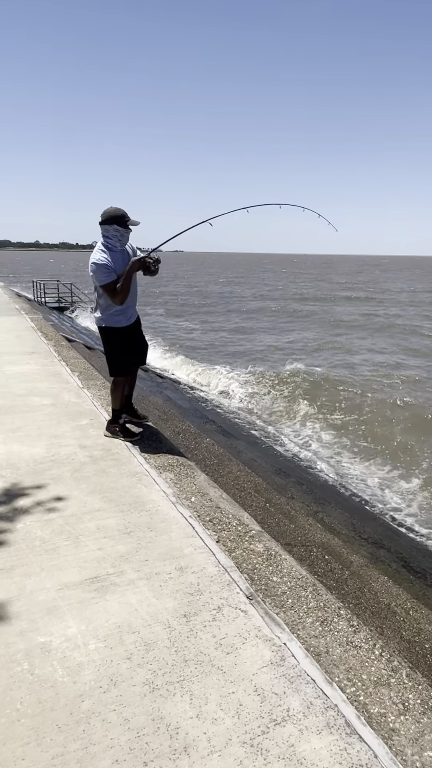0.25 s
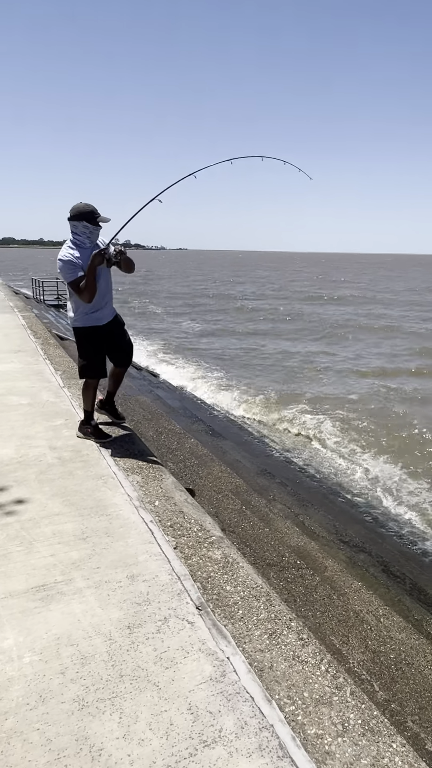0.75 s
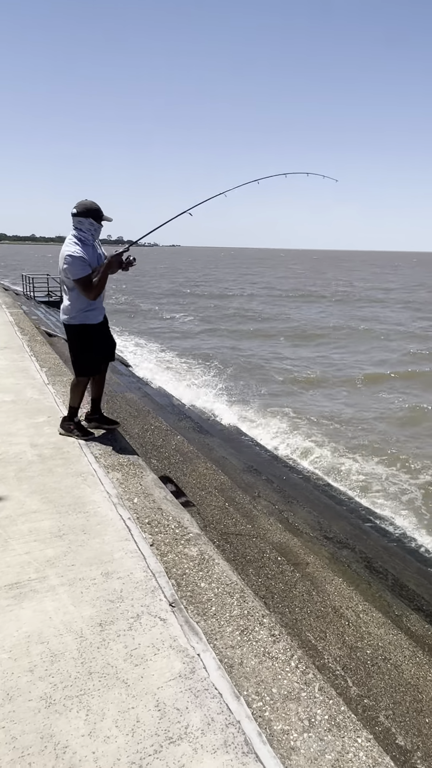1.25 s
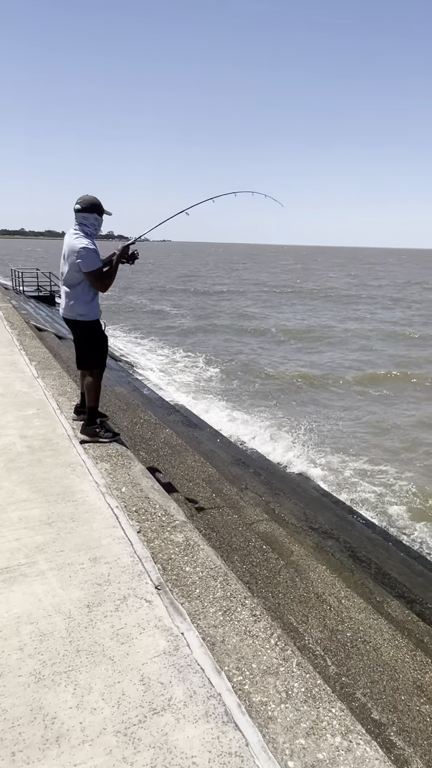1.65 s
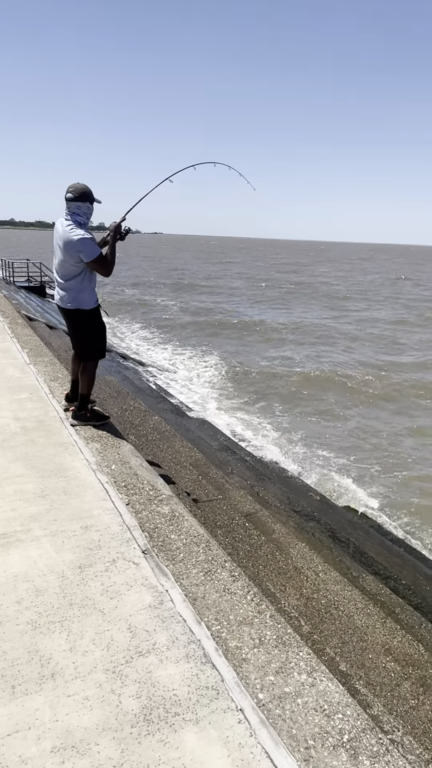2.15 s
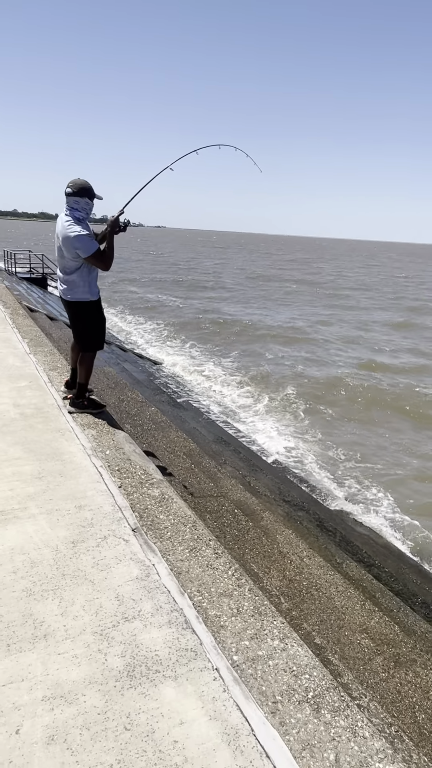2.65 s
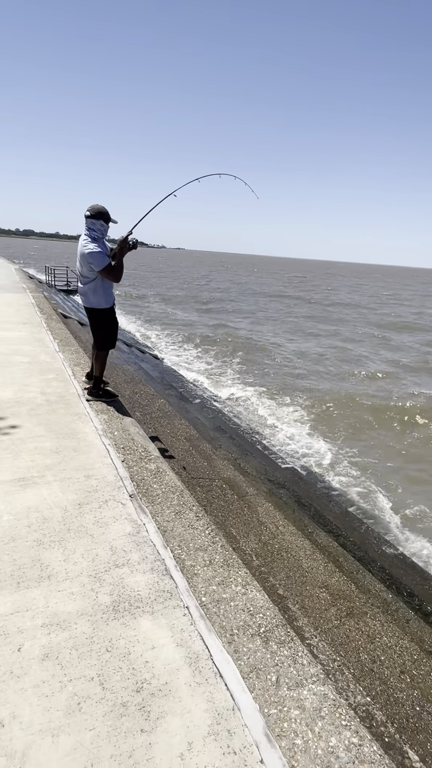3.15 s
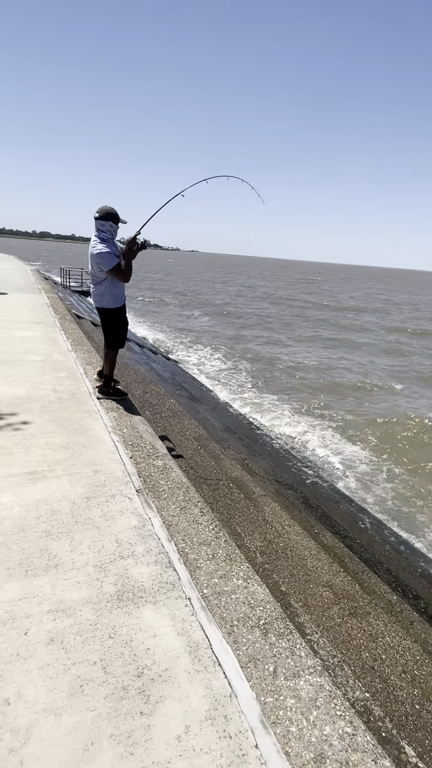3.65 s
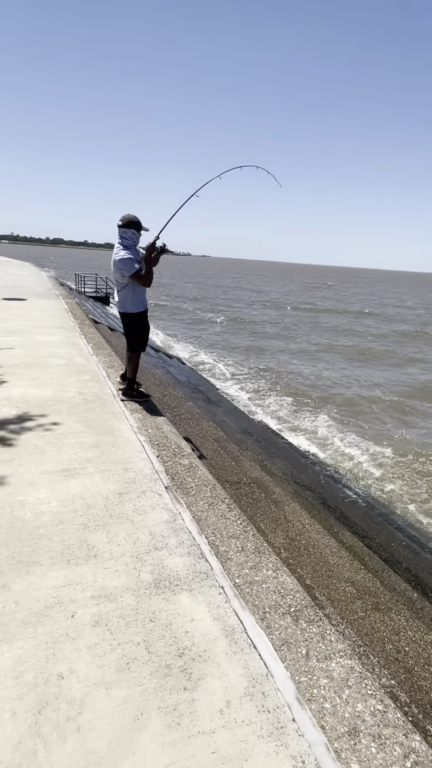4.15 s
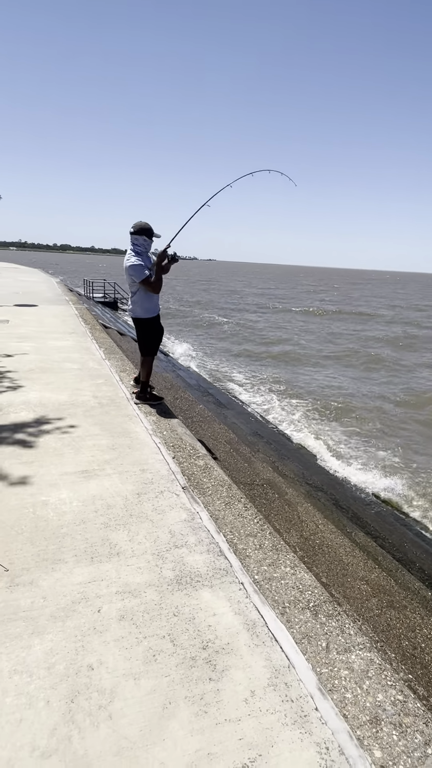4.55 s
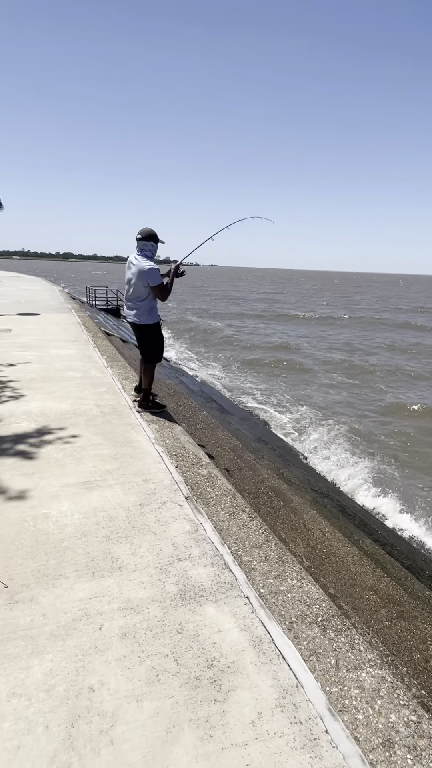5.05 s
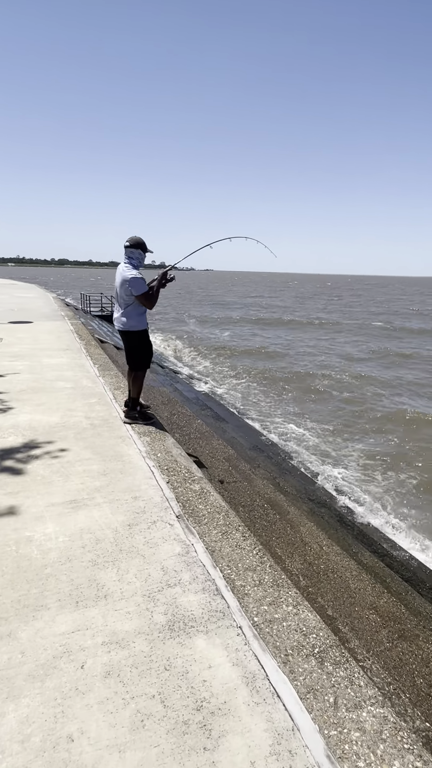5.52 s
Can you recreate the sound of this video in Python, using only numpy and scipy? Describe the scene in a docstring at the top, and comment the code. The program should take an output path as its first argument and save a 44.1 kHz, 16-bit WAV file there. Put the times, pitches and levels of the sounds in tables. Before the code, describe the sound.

Outdoors at a wide, choppy lake, waves run along a sloping concrete seawall. A soft low thud opens, then water churns steadily, with booming crests, hollow gulps, gurgles, slaps and hissing foam. After an early lull the wind freshens, rumbling and thumping on the exposed microphone. The bass sits in the middle while the splashing spreads to both sides.

```python
"""Choppy lake waves run along a sloping concrete seawall while wind presses on the microphone.
A thud on the wall, a ring of damped modes, comes first over the churn: resonant bubble swarms and noise.
Each wave booms and leaves hissing foam and spray; air pockets gulp, bubble clumps gurgle and
sheets of water slap the concrete. After a lull the wind, shaped noise, freshens and eddies thump.
Two ports a little apart pick up the water; the bass is the same in both."""
import sys
import numpy as np
from scipy import signal
from scipy.fft import rfft, irfft
from scipy.io import wavfile
from scipy.ndimage import uniform_filter1d

SR = 44100
rng = np.random.default_rng(int(sys.argv[2]) if len(sys.argv) > 2 else 0)


def store_wav(level_fs):
    """Save 16-bit WAV to argv[1]."""
    pcm = np.round(np.clip(np.atleast_2d(level_fs), -1, 1) * 32767)
    wavfile.write(sys.argv[1], SR, pcm.T.astype(np.int16))


N = 255074
TIME = np.arange(N) / SR
FRAME = 1024  # samples in a short-time spectrum
HZ = np.fft.rfftfreq(FRAME, 1 / SR)[:, None]

# waves that break on the wall: (crest [s], strength over the calm wash [dB], build-up [s], drain [s],
# weight of the trapped air in the boom [dB], boom pitch [Hz])
WAVES = [(.14, 0.5, 0.046, 1, -25, 277), (.92, 6.5, 0.35, 0.37, -0.5, 306), (1.4, 4, 0.37, 0.092, 2, 293),
         (2.361, -2.5, 0.15, 0.31, 1, 285), (2.95, 2.5, 0.29, 0.42, 3, 221), (3.6, 8, 0.52, 0.24, 0.5, 191),
         (4.84, 8, 0.46, 0.71, 1.5, 247), (5.42, 4.5, 0.5, 1, -10, 195)]
# answer of a bubble size to the waves: (calm level [dB], rise per surge [dB/dB], delay [s],
# change per treble level [dB/dB])
BOOM_LAW = (-43, 1.3344, 0.14, -0.15)
FOAM_LAW = (-54.4, 0.96, 0.02, 0.5)
SPRAY_LAW = (-57.7, 0.85, 0.02, 1)
# rise and fall of the treble, with a brief dip near 2.2 s; each law scales it: (time [s], level [dB])
TREBLE_LEVEL = [(0, -7.6), (.45, -5.4), (.9, -4.2), (1.25, -5), (1.45, -4.2), (1.75, -1.2), (2.1, -2),
                (2.19, -5.2), (2.3, -3.6), (2.55, -4.4), (2.7, -2.7), (3.45, -3.6), (3.8, -2), (4.25, -3.2),
                (4.7, -.6), (5.1, -1), (5.78, -1.3)]
# the churn before its hollow, slaps and tumbling: (time [s], level [dB])
CHURN_LEVEL = [(0, -45), (.15, -39.5), (.55, -41), (.85, -37.5), (1.15, -39), (1.4, -38.5), (1.7, -40.5),
               (2.05, -43.5), (2.3, -42), (2.7, -41), (3.1, -40.5), (3.55, -35.5), (3.9, -39), (4.2, -40.5),
               (4.5, -38), (4.95, -37.5), (5.3, -38), (5.78, -39.5)]
# relative spectra of the bubble sizes: (frequency [Hz], level per Hz [dB])
BOOM_SPECTRUM = [(50, -65), (130, -5), (190, -1), (280, 0.5), (380, -4), (520, -15), (800, -46),
                 (2000, -71)]
CHURN_SPECTRUM = [(150, -11), (350, 4), (520, 5), (700, 2.5), (1000, -3.5), (1500, -7.5), (2000, -12.5),
                  (3000, -12), (7000, -61)]
FOAM_SPECTRUM = [(700, -17), (1600, -7), (2200, -5), (2800, 0), (3600, -4.5), (4400, -3.7), (5500, -8),
                 (7000, -15), (9000, -24), (16000, -45)]
SPRAY_SPECTRUM = [(2500, -25), (4500, -3), (5600, 2), (7000, 0), (8500, -1), (10000, -2.5), (11500, -5),
                  (13700, -5.5), (15500, -16)]
# a wandering spectral peak: (time [s], pitch [Hz], lift [dB])
CHURN_PEAK = [(0, 780, 7.5), (.55, 755, -0.5), (.9, 1870, 1.5), (1.6, 2000, 3), (2.1, 770, 1),
              (2.65, 787, 5.5), (3.1, 1050, -0.5), (3.9, 1100, -0.5), (4.5, 1380, 0.5), (5.05, 1150, 5),
              (5.5, 860, 3.5), (5.78, 770, 7)]
FOAM_PEAK = [(0, 3800, 1), (.45, 3820, 2.5), (1.0, 3850, 0.5), (1.6, 4200, 0.5), (2.6, 5000, 0),
             (4.1, 4900, 0), (4.4, 3060, 1), (4.8, 2900, 2), (5.3, 3000, -1.5), (5.78, 3800, 2.5)]
SPRAY_PEAK = [(0, 4300, 2), (1.6, 4500, 2), (2.6, 5000, 2.5), (3.0, 5800, 4.5), (4.1, 6200, 4),
              (4.8, 6000, 4), (5.78, 6400, 3.5)]
# a narrow hollow in the churn, a bump where positive: (time [s], pitch [Hz], change [dB])
HOLLOW = [(0, 1460, -1), (.55, 1190, -1), (1.3, 800, -1.5), (1.9, 950, -1.5), (2.5, 980, -2),
          (2.75, 895, -2), (2.95, 706, 2), (4.1, 760, -0.5), (4.8, 650, -11.5), (5.5, 584, 3)]
# the port pair, before its blend toward mono: (frequency [Hz], left-right likeness [0-1],
# lead of the left [rad], left over right [dB])
PORTS = [(250, .6, 1.8, 6), (450, .8, 2.6, 2.2), (660, .92, 3.15, 1), (820, .7, 3.6, 2.5),
         (1050, .45, 4.6, 4.6), (1600, .74, 6, 3.5), (2100, .66, 7.7, 1), (2400, .72, 9.4, 0),
         (2750, .72, 10, 0), (3200, .68, 9.9, -.6), (4100, .45, 10.1, -2.4), (5100, .82, 8.9, -2.5),
         (5900, .9, 9.5, .7), (6600, .76, 10.1, .4), (8000, .68, 12.2, -.8), (10200, .88, 15.7, 0),
         (12400, .82, 18.85, 0), (15500, .7, 23.4, 0)]
# the ports share all below an edge: (time [s], edge [Hz], steepness [filter order], share above it [0-1])
MONO_BELOW = [(0, 1070, 11, 0.01), (1.5, 1020, 10, 0), (2.1, 730, 13, 0), (2.7, 536, 12, 0.01),
              (4.0, 564, 12, 0.02), (4.5, 396, 6, 0), (5.78, 410, 4.5, 0)]
# foam spread widely along the wall makes the ports less alike in one band: (time [s], loss of likeness [0-1])
FOAM_SPREAD = [(0, .95), (1.5, .8), (2.2, .35), (4.0, .25), (4.6, 0)]
FOAM_SPREAD_HZ, FOAM_SPREAD_OCTAVES = 4150, .29
# wind at the microphone before its gusts, a lull and then a fresh breeze: (time [s], level [dB])
WIND_LEVEL = [(0, -38), (.25, -42.5), (.72, -47.5), (1.0, -42), (2.55, -40), (2.95, -33), (3.5, -30.5),
              (3.85, -34.5), (4.55, -32), (5.15, -29.5), (5.78, -30)]
# relative spectrum of the wind: (frequency [Hz], level per Hz [dB])
RUMBLE_SPECTRUM = [(15, -58), (28, -25), (45, 1), (63, -8.5), (100, 2), (150, -5.5), (250, -15), (600, -81),
                   (2000, -80)]
# rings of a lump of water on the wall: (frequency [Hz], peak before the trim [dB], t60 [s])
THUD_RINGS = [(169, -16, 0.067), (321, -14.5, 0.09), (466, -20.5, 0.051)]
# air pockets that close under a crest: (time [s], peak before the trim [dB], pitch [Hz])
GULPS = [(0.213, -23.5, 192), (1.194, -13.5, 248), (1.287, -17.5, 290), (1.38, -17.5, 243),
         (1.497, -14.5, 293), (1.641, -20, 245), (2.398, -25.5, 258), (2.645, -20, 258), (3.226, -6.5, 232),
         (3.345, -20.5, 303), (3.445, -18, 205), (3.594, -12, 231), (3.754, -19.5, 327), (4.45, -23, 338),
         (4.569, -14, 269), (4.631, -16.5, 274), (4.824, -14, 273), (4.854, -14, 303), (5.104, -15.5, 297),
         (5.417, -11, 193)]
# clumps of bubbles out of the wash: (time [s], level over the uncoloured wash [dB], pitch [Hz], length [s])
GURGLES = [(.78, 0, 1360, .035), (.895, 4, 1920, 0.027), (1.275, 3, 1050, 0.021), (1.36, -1.5, 1080, .2),
           (2.265, 5, 775, .04), (2.545, -3, 765, 0.037), (2.86, 4, 880, .16), (3.06, 9, 1080, .03),
           (3.075, 6, 686, 0.027), (3.17, 5, 1044, 0.13), (3.92, 2, 1140, 0.042), (4.38, 3, 606, .025),
           (4.465, 5, 1210, 0.03), (4.821, 4, 1640, 0.067), (5.0, 0, 1090, 0.066), (5.09, -6, 760, 0.041),
           (5.425, -4, 645, 0.021), (5.49, -1, 880, 0.041)]
# sheets of water that slap the concrete, before their raggedness: (time [s], rise of the churn [dB],
# rise of the hiss [dB], twice the time to the peak [s])
SLAPS = [(0.9, 1, 2, 0.023), (1.26, 4.5, 4.5, 0.041), (1.34, 3.5, 1, 0.051), (1.538, 0.5, 3.5, 0.066),
         (2.37, 1.5, 4, 0.027), (3.073, 3, 1.5, 0.066), (3.223, 5.5, 4, .024), (4.803, 1.5, 2.8, 0.036),
         (5.417, 2, 0.5, .025)]
# eddies that strike the microphone: (time [s], peak before the trim [dB], pitch [Hz], t60 [s])
BUFFETS = [(3.452, -9.5, 86.5, 0.081), (3.519, -9, 173, 0.1), (3.524, -8.5, 85, 0.073),
           (4.565, -20, 91.5, 0.054), (4.848, -11, 128, 0.036), (5.19, -15, 69, 0.22),
           (5.654, -11, 63, 0.092)]


def gain_of(db):
    """Level: decibels as an amplitude ratio."""
    return 10 ** (np.asarray(db) / 20)


def evened(x):
    """Normalisation: a signal scaled to rms 1."""
    return x / np.sqrt(np.mean(x ** 2) + 1e-20)


def curves(rows, t=TIME):
    """Linear interpolation: every column of a time table at the times t."""
    s, *columns = np.transpose(rows)
    return [np.interp(t, s, c) for c in columns]


def spectra(rows):
    """Logarithmic pitch scale: every column of a frequency table, interpolated over log frequency."""
    f, *columns = np.transpose(rows)
    return [np.interp(np.log(HZ + 1), np.log(f), c) for c in columns]


def bell(centre_hz, octaves):
    """Resonance shape: a Gaussian over pitch, 1 at its centre."""
    distance = np.log2((HZ + 1) / centre_hz)
    return np.exp(-(distance / octaves) ** 2)


def to_frames(x):
    """Short-time Fourier analysis: frame times and spectra."""
    return signal.stft(x, SR, nperseg=FRAME, noverlap=FRAME - FRAME // 4)[1:]


def to_sound(z):
    """Overlap-add synthesis: short-time spectra back to samples."""
    return signal.istft(z, SR, nperseg=FRAME, noverlap=FRAME - FRAME // 4)[1][..., :N]


def flutter(rate_hz):
    """Turbulent fluctuation: band-shaped noise of rms 1, from about 2 Hz to the given rate."""
    f = np.fft.rfftfreq(N, 1 / SR)
    band = np.exp(-(f / rate_hz) ** 2) * (1 - np.exp(-(f / 2) ** 2))
    return evened(irfft(rfft(rng.standard_normal(N)) * band, N))


def patches(shape, frames, bins):
    """Local variation: a smoothed random field of rms 1, as if single splashes had their own colours."""
    field = uniform_filter1d(rng.standard_normal(shape), bins, axis=0)
    for _ in range(2):
        field = uniform_filter1d(field, frames, axis=1)
    return evened(field)


def ring(hz, t60, swell_s, glide):
    """Damped resonance: a sine swells and decays; its pitch shifts by the fraction 2 * glide over t60."""
    t = np.arange(int(t60 * SR) + 2) / SR
    shape = (1 - np.exp(-(t / swell_s) ** 2)) * gain_of(-60 * t / t60)
    return shape / shape.max() * np.sin(2 * np.pi * hz * t * (1 + glide * t / t60))


def thumps(rows, trim_db, swell_s, glide):
    """Superposition: damped rings (time [s], peak before the trim [dB], pitch [Hz], t60 [s]) add up."""
    out = np.zeros(N)
    for s, db, hz, t60 in rows:
        thump = gain_of(db + trim_db) * ring(hz, t60, swell_s, glide)
        part = out[round(s * SR):][:len(thump)]
        part += thump[:len(part)]
    return out


def bubbles(low_hz, high_hz, per_s, cycles, spread_db, share, count=24):
    """Bubble resonance: two unrelated swarms of rising rings over the smooth noise of countless far ones."""
    swarm = np.zeros((2, N))
    for hz in np.geomspace(low_hz, high_hz, count):
        sizes = gain_of(spread_db * np.minimum(rng.exponential(1, (2, N)), 4))
        births = sizes * (rng.random((2, N)) < per_s / count / SR)
        bubble = ring(hz, cycles / hz, swell_s=.5 / hz, glide=0.12)
        swarm += signal.oaconvolve(births, hz * bubble[None], axes=1)[:, :N]
    # the swarm has the same power per Hz as the noise within its band
    swarm = evened(swarm) * np.sqrt(2 * (high_hz - low_hz) / SR)
    return np.sqrt(share) * swarm + np.sqrt(1 - share) * rng.standard_normal((2, N))


def at_ports(pair, colour, peak, peak_octaves, patchy_db):
    """Interaural coherence: colours and blends two sounds into left and right; their mean has rms 1."""
    t, (a, b) = to_frames(pair)
    likeness, lead, balance_db = spectra(PORTS)
    edge_hz, steepness, shared = curves(MONO_BELOW, t)
    apart = (1 - np.clip(shared, 0, 1)) * (1 - 1 / (1 + (HZ / edge_hz) ** steepness))
    spread_loss = curves(FOAM_SPREAD, t)[0] * bell(FOAM_SPREAD_HZ, FOAM_SPREAD_OCTAVES)
    likeness = np.clip(likeness * (1 - spread_loss), 0, .92)
    # water to one side reaches the ports at different times
    same = 1 - apart + apart * likeness * np.exp(-1j * lead)
    right = same * a + np.sqrt(np.maximum(1 - abs(same) ** 2, 0)) * b
    lean = gain_of(np.sqrt(apart) * balance_db / 2)
    peak_hz, peak_db = curves(peak, t)
    gain = gain_of(spectra(colour)[0] + peak_db * bell(peak_hz, peak_octaves))
    # the colour moves while the expected loudness of the mean stays
    gain = gain / np.sqrt((gain ** 2 * (1 + same.real)).sum(0))
    gain = gain * gain_of(patchy_db * patches(a.shape, frames=7, bins=7))
    out = to_sound(np.array([a * lean, right / lean]) * gain)
    return out / np.std(out.mean(0))


def swells(t):
    """Wave growth and decay: power builds as a bell curve to each crest, then drains exponentially."""
    powers = []
    for crest, db, build, drain, *_ in WAVES:
        before = np.minimum(t - crest, 0) / build
        after = np.maximum(t - crest, 0) / drain
        powers.append(gain_of(db) ** 2 * np.exp(-before ** 2 - after))
    return np.array(powers)


def level(law, weights=1):
    """Energy summation: the calm level [dB] of one bubble size, raised by the surge of all waves."""
    calm_db, follow, delay, treble = law
    surge_db = 10 * np.log10(1 + (weights * swells(TIME - delay).T).sum(1))
    return calm_db + follow * surge_db + treble * curves(TREBLE_LEVEL)[0]


def commonest(pitches, lift_db, delay_s):
    """Weighted mean: rows (time [s], pitch [Hz], lift [dB]) led by the strongest wave a moment ago."""
    t = TIME[::FRAME]
    power = swells(t - delay_s) ** 2 + 1e-12
    share = power / power.sum(0)
    return np.column_stack([t, pitches @ share, np.full(len(t), lift_db)])


def boom():
    """Low bubble resonance: clouds of trapped air boom as waves break, at the pitch of the wave."""
    *_, air_db, boom_hz = np.transpose(WAVES)
    pair = bubbles(140.7, 546, per_s=330, cycles=31.7, spread_db=1.0, share=0.17)
    peak = commonest(boom_hz, lift_db=3.5, delay_s=0.16)
    pair = at_ports(pair, BOOM_SPECTRUM, peak, peak_octaves=0.48, patchy_db=-0.7)
    return pair * gain_of(level(BOOM_LAW, gain_of(air_db) ** 2) + 0.56 * flutter(rate_hz=9))


def hollowed(pair, octaves):
    """Spectral notch: a narrow hollow wanders in pitch and depth."""
    t, z = to_frames(pair)
    hz, change_db = curves(HOLLOW, t)
    return to_sound(z * gain_of(change_db * bell(hz, octaves)))


def churn(tumble, splash_db):
    """Middle bubble resonance: tumbling water rings with bubbles and gurgles, on its own level curve."""
    pair = bubbles(464.0, 2463, per_s=520, cycles=22.6, spread_db=1.7, share=0.46)
    pair = pair + gurgles(scatter_octaves=.2, cycles=25)
    pair = at_ports(pair, CHURN_SPECTRUM, CHURN_PEAK, peak_octaves=0.32, patchy_db=1.47)
    pair = hollowed(pair, octaves=0.11)
    return pair * gain_of(curves(CHURN_LEVEL)[0] + splash_db + 0.35 * tumble)


def foam(tumble, slap_db):
    """Small-bubble resonance: many short, high rings merge into a hiss."""
    pair = bubbles(1720, 6700, per_s=2800, cycles=5.7, spread_db=6.0, share=0.15)
    pair = at_ports(pair, FOAM_SPECTRUM, FOAM_PEAK, peak_octaves=.25, patchy_db=1.2)
    return pair * gain_of(level(FOAM_LAW) + slap_db + 0.6 * tumble)


def spray(tumble, slap_db):
    """Finest bubble resonance: the highest rings and noise make the spray's hiss."""
    pair = bubbles(5000, 15500, per_s=1800, cycles=8, spread_db=3.6, share=.33)
    pair = at_ports(pair, SPRAY_SPECTRUM, SPRAY_PEAK, peak_octaves=.22, patchy_db=1.3)
    return pair * gain_of(level(SPRAY_LAW) + 0.96 * slap_db + 0.75 * tumble)


def surf():
    """Common modulation: waves stir boom, foam and spray; tumbling and slaps move churn, foam and spray."""
    tumble = flutter(rate_hz=28)
    splash_db, slap_db = slaps(ragged=.3)
    return boom() + churn(tumble, splash_db) + foam(tumble, slap_db) + spray(tumble, slap_db)


def wind():
    """Turbulent pressure: low noise with gusts on the microphone, the same in both ears."""
    z = to_frames(rng.standard_normal(N))[1]
    rumble = to_sound(z * gain_of(spectra(RUMBLE_SPECTRUM)[0]))
    gusts_db = 1.5 * flutter(rate_hz=24)
    return evened(rumble) * gain_of(curves(WIND_LEVEL)[0] + gusts_db)


def thud():
    """Impact excitation: a lump of water strikes a few low, heavily damped rings at once."""
    rows = [(.096, db, hz, t60) for hz, db, t60 in THUD_RINGS]
    return thumps(rows, trim_db=-7.5, swell_s=0.0015, glide=-0.035)


def gulps():
    """Cavity resonance: each closing air pocket rings down while its pitch rises a little."""
    t60 = 0.081  # s
    return thumps([(*row, t60) for row in GULPS], trim_db=-7.0, swell_s=0.0036, glide=0.024)


def gurgles(scatter_octaves, cycles, count=14):
    """Clustered resonance: bubbles of about one size in a ragged burst, scaled to the energy of the wash."""
    out = np.zeros((2, N))
    for s, db, hz, length in GURGLES:
        for port in out:
            late, detune, size = rng.random((3, count))
            pitches = hz * 2 ** (scatter_octaves * (2 * detune - 1))
            rows = np.column_stack([s + length * late, -10 * size, pitches, cycles / pitches])
            clump = thumps(rows, trim_db=0, swell_s=.5 / hz, glide=.1)
            wash_energy = 2 * hz * scatter_octaves * length
            port += clump * gain_of(db) * np.sqrt(wash_energy / (clump @ clump + 1e-20))
    return out


def slaps(ragged):
    """Impact transient: churn and hiss rise [dB] and fall as a sheet of water lands and tears into drops."""
    rise = np.zeros((2, N))
    for s, churn_db, hiss_db, length in SLAPS:
        u = np.maximum(TIME - s, 0) / (length / 2)
        rise += np.outer([churn_db, hiss_db], u * np.exp(1 - u))
    return rise * (1 + ragged * flutter(rate_hz=110))


def buffets():
    """Eddy impact: low, falling, damped thumps on the microphone."""
    return thumps(BUFFETS, trim_db=-5.5, swell_s=0.0038, glide=-0.14)


def scene():
    """Superposition: surf, wind, thud, gulps and buffets add as pressures."""
    return surf() + wind() + thud() + gulps() + buffets()


def record(dry):
    """Linear filtering: the microphone's bass roll-off, then the upper band limit."""
    bass_cut = signal.butter(4, 41.7, "high", fs=SR, output="sos")
    thinned = signal.sosfilt(bass_cut, dry)
    band_limit = signal.firwin(511, 15700, window=("kaiser", 9), fs=SR)
    return signal.oaconvolve(thinned, band_limit[None], "same")


dry = scene()
out = record(dry)
store_wav(out)
```